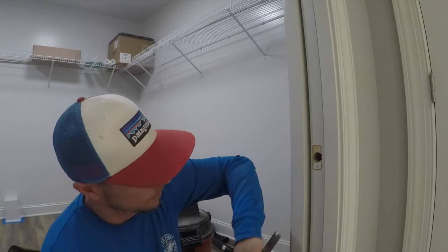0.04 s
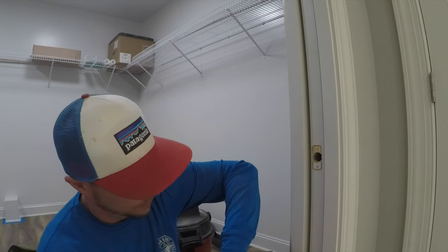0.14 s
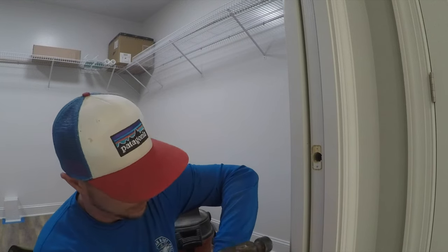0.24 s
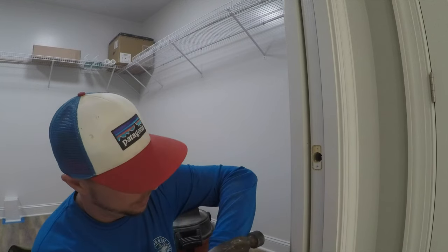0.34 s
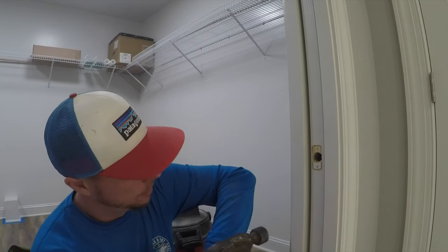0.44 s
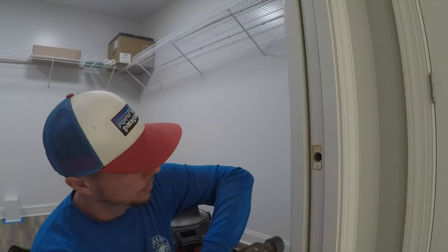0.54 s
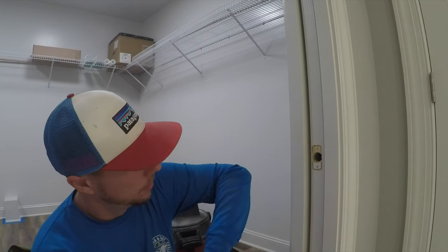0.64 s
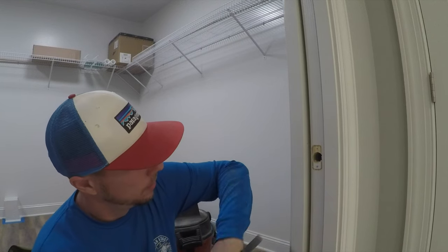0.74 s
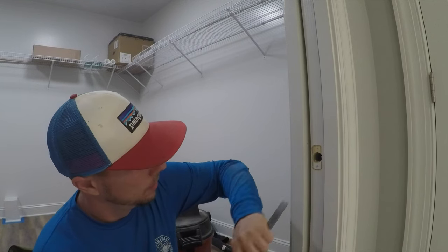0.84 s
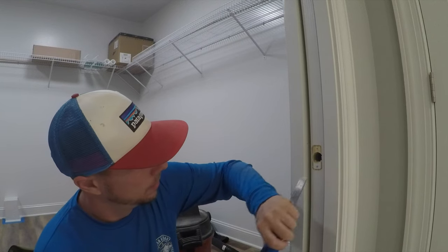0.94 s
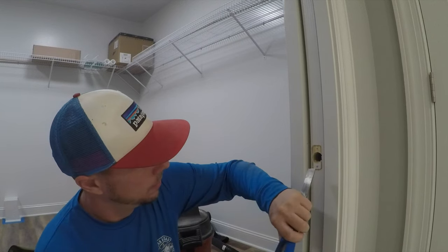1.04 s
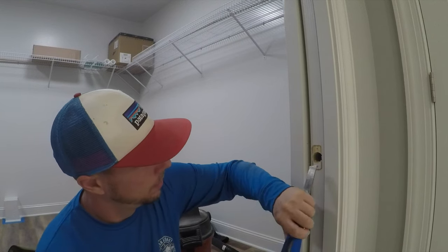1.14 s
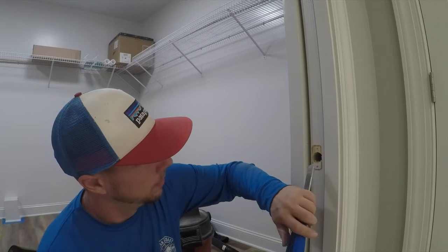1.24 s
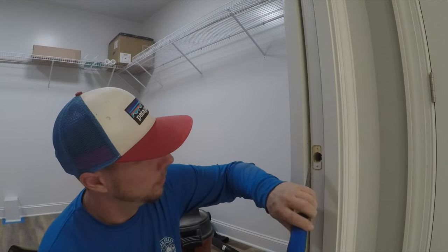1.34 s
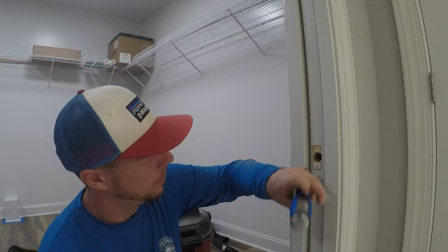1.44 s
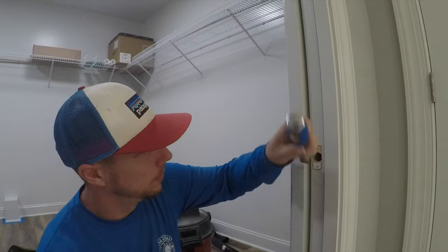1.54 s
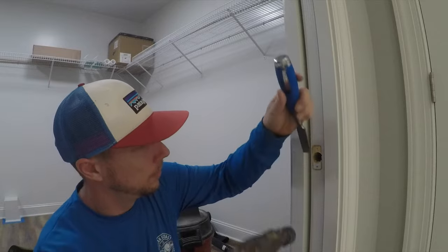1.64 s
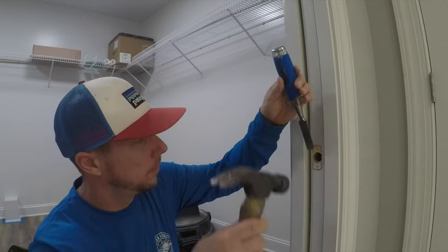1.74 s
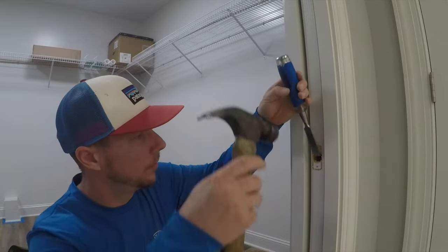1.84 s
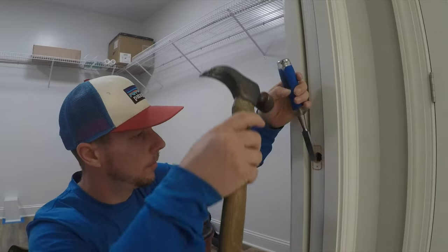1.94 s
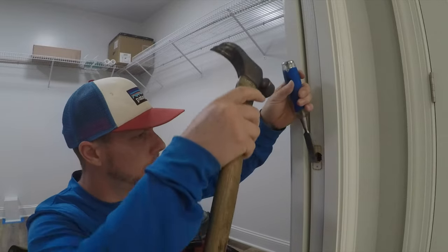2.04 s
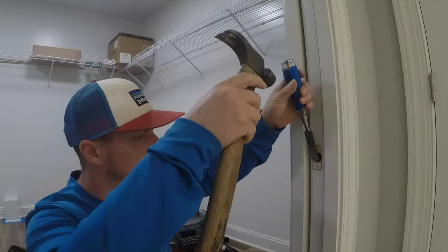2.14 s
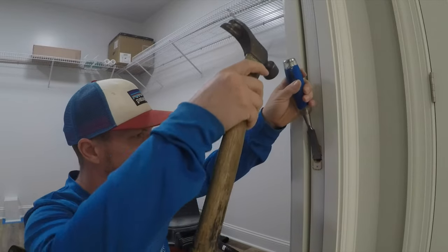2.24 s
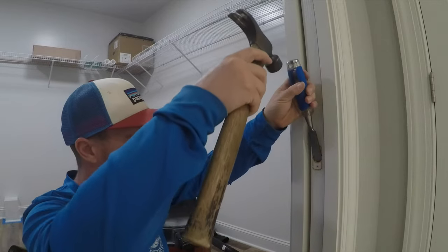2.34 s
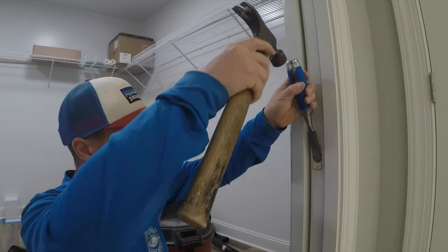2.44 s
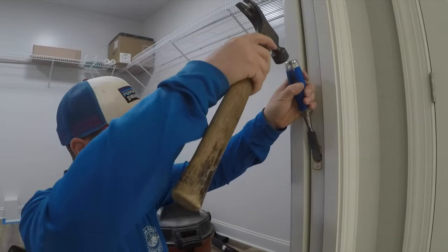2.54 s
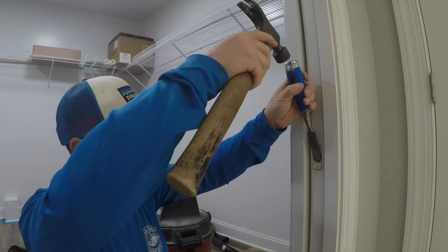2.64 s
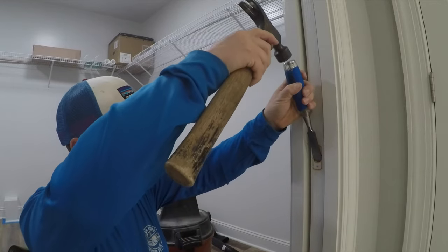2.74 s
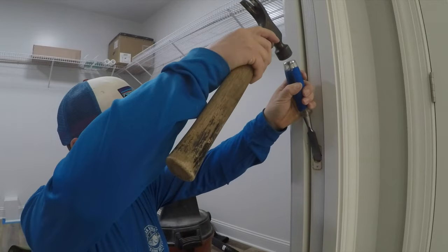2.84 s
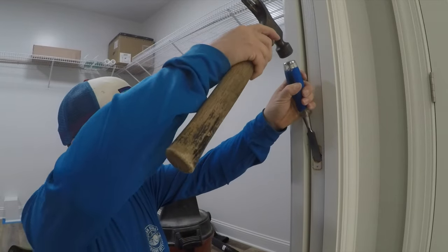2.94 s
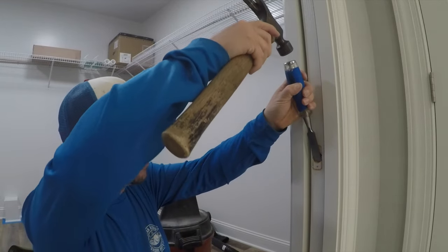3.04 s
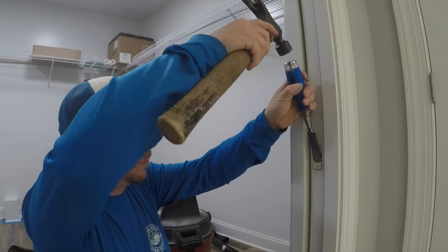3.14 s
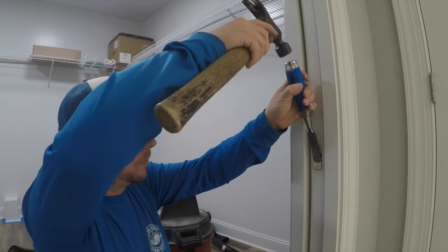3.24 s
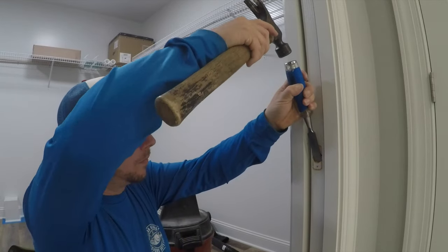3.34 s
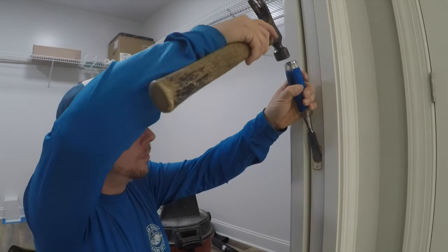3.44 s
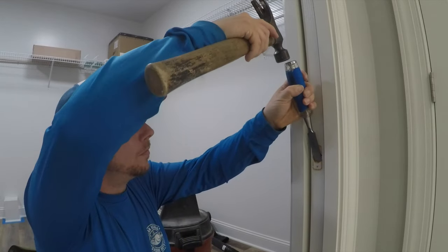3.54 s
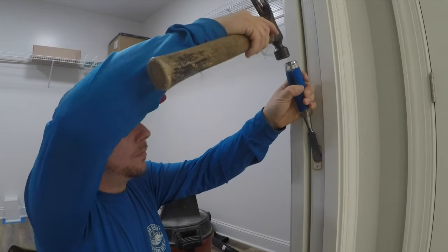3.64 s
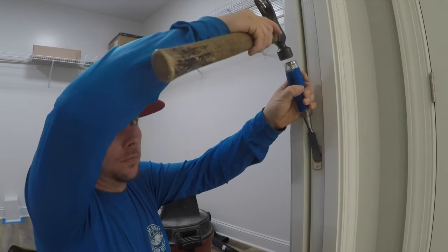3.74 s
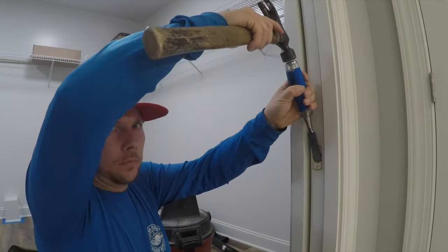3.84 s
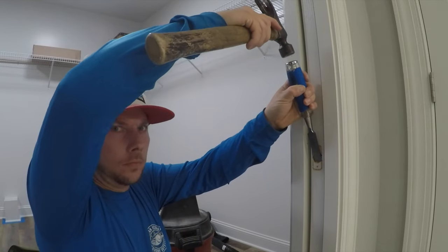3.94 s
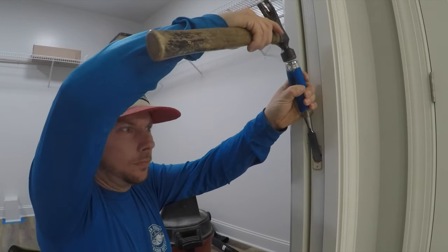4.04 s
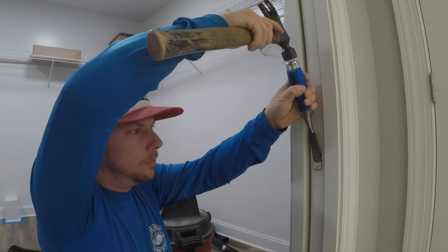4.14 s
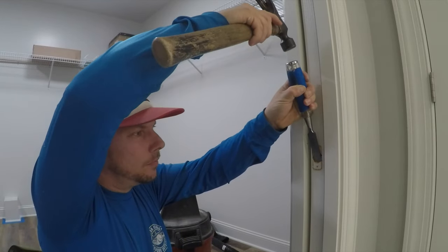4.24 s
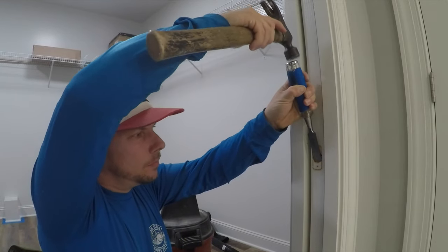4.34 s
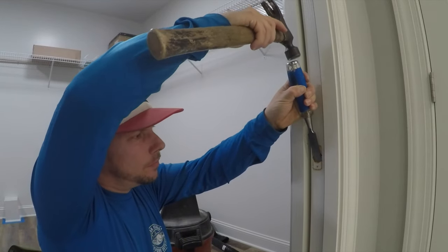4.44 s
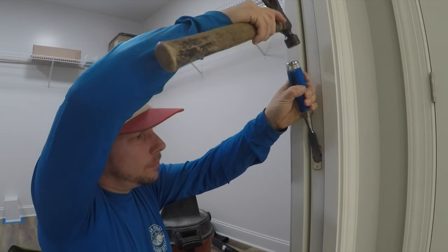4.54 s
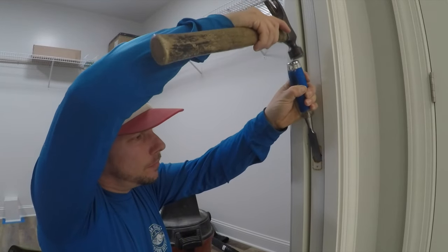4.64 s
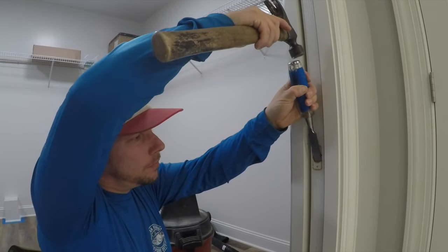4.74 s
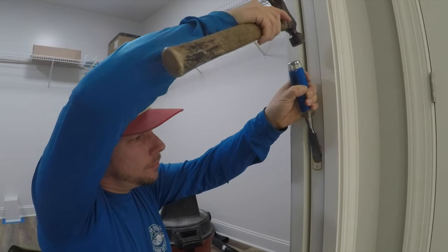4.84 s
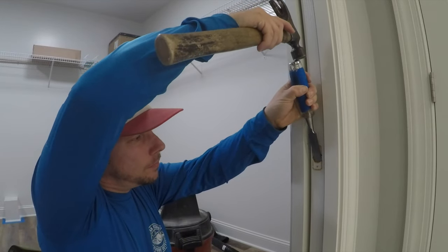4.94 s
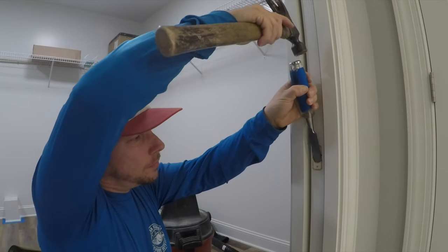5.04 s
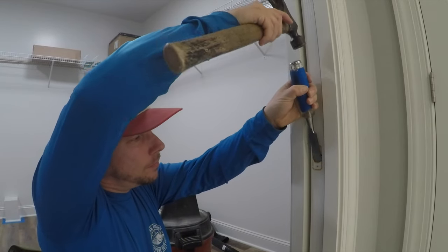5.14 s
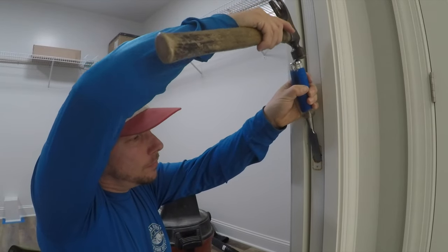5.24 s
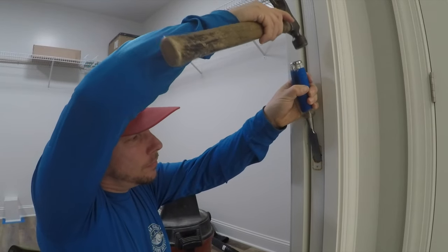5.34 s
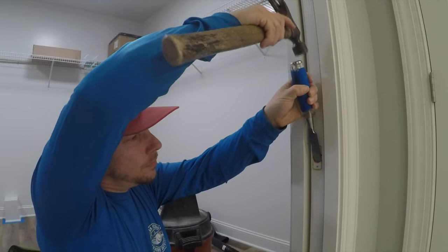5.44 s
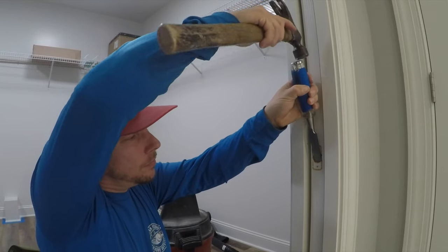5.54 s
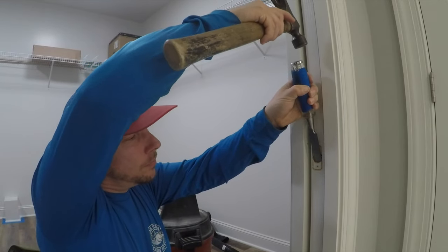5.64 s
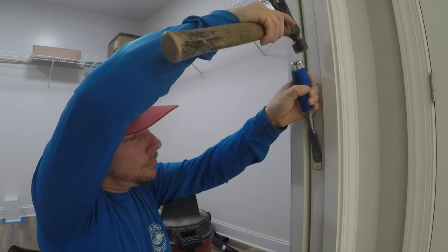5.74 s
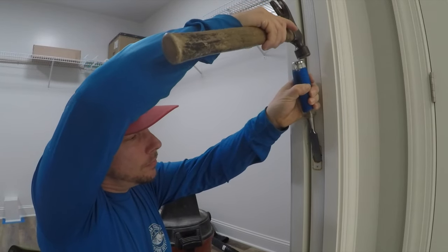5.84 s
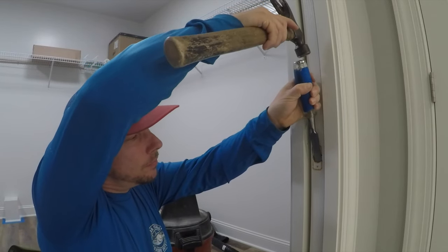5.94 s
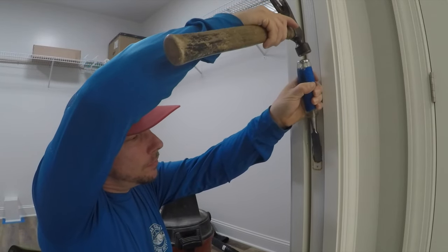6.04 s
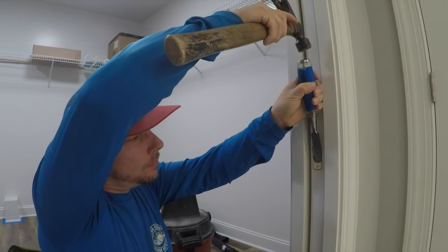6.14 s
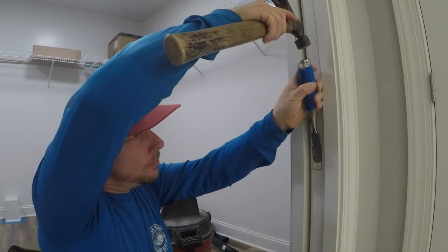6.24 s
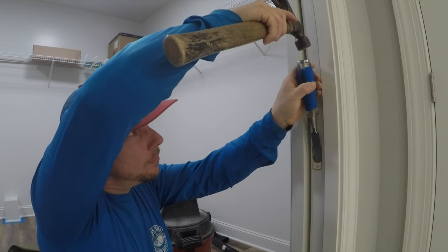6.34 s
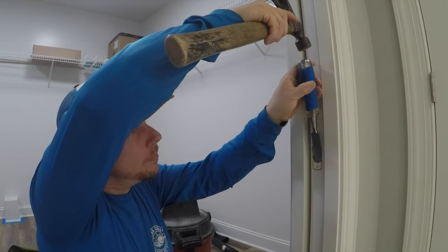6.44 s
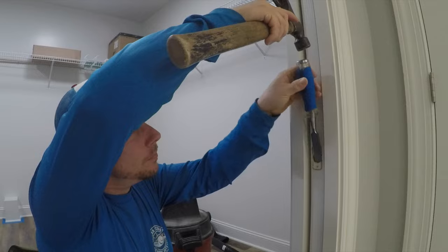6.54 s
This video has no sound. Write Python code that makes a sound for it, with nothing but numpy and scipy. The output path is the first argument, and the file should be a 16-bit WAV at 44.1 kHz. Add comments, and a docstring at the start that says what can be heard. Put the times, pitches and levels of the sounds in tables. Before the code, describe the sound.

A steel hammer taps a chisel into a wooden door edge eight times, sharp ringing blows in a small bare room.

```python
"""A small bare room, one microphone close to a door: a steel hammer taps a chisel into the door's edge.
Eight blows, harder as the blade seats, the last a light one. Each cracks, rings the chisel and the wood,
rattles the hollow panel and sets the whole door swaying; the room rings on for a second.
Before that, tools click in the hand, a sleeve brushes past and the chisel is set down with a knock."""
import sys
import numpy as np
from scipy import signal
from scipy.fft import rfft, irfft, next_fast_len
from scipy.io import wavfile
from scipy.ndimage import map_coordinates

SR = 44100
rng = np.random.default_rng(int(sys.argv[2]) if len(sys.argv) > 2 else 0)


def dump(signal):
    """Clip the signal to [-1, 1] and save it as 16-bit WAV at the path in sys.argv[1]."""
    limited = np.clip(np.atleast_2d(signal).T, -1, 1)
    pcm = np.round(limited * 32767).astype(np.int16)
    wavfile.write(sys.argv[1], SR, pcm)


N = 291060
T = np.arange(int(1.3 * SR)) / SR  # time within one event, s
CLOCK = np.arange(N) / SR  # time within the scene, s

# hammer blows: t/s, force/dB, blade seated/0-1, bite f/Hz, treble at 10 kHz/dB, clear tones/dB
HAMMER_BLOWS = [(3.781, -13, 0.03, 3730, 1, -2), (4.0481, -10, 0.13, 3200, 3, 2.5),
                (4.3479, -3.5, 0.26, 3370, -.5, -1), (4.6448, -3.5, 0.73, 4060, 0.5, 2.5),
                (4.9201, -2, 1, 3970, 0, 0.5), (5.1824, -1.5, 0.95, 4160, 1.5, -10),
                (5.4539, -1, 0.99, 3420, 0, -2.5), (5.819, -9.5, .48, 3600, -18, 1)]
# modes rung by a blow: f/Hz, level with the blade loose/dB, level with it seated/dB, t60/s
CHISEL_DAMPED_MODES = [(2865, -20, -16.5, 0.042), (3154, -20.5, -6, 0.028), (3330, -27.5, -12, 0.033),
                       (3595, -15, -26.5, 0.027), (3923, -11, -18.5, 0.041), (4074, -29.5, -17.5, 0.028),
                       (7870, -18, 0.5, 0.017), (8900, -14.5, -14, 0.0054), (8940, -22.5, -24.5, 0.021),
                       (13200, -22, -29, 0.01), (14600, -33.5, -26, .02)]
CHISEL_CLEAR_TONES = [(5520, -33, -36, .3), (6842, -34, -24, .27), (8062, -18, -30, .2),
                      (9025, -13, -12, .045), (13690, -22, -23, .055), (13950, -32, -24, .05)]
DOOR_EDGE_MODES = [(844.3, -37, -22.5, 0.12), (982, -40.5, -34.5, 0.12), (1316, -15.5, -24.5, 0.018),
                   (1543, -30.5, -21.5, 0.066), (1760, -19.5, -21.5, 0.065), (1985, -16, -26.5, 0.045),
                   (2154, -21.5, -21.5, 0.059)]
# peaks in the door's clack: f/Hz, half width/Hz, level loose/dB, level seated/dB
DOOR_RESONANCES = [(400, 45, 4, 5), (820, 25, 0, 5), (950, 20, 0, 9), (1075, 25, 3, 7), (1290, 70, 4, 4),
                   (1550, 35, 2, 4), (1900, 110, 2, 1), (3170, 70, 5, 4), (3420, 120, 1, 3),
                   (3850, 110, 4, 2), (4220, 120, 3, 4), (8060, 130, 7, 2), (9060, 150, 6, 3),
                   (11200, 120, 6, 1), (13780, 260, 10, 10)]
# spectra of a blow: f/Hz, level/dB
CRACK_SPECTRUM = [(100, -29.5), (400, -23), (800, -14), (1600, 0.5), (2500, -8), (3500, 1.5), (5000, -5.5),
                  (6500, -9), (8000, 4.5), (9200, 1.5), (10000, -17.5), (12800, -15.5), (14500, -13),
                  (16000, -23)]  # steel on steel
LOOSE_CLACK_SPECTRUM = [(130, -10.5), (400, -7), (800, -4.5), (1300, -1), (1900, -2), (2500, -2.5),
                        (3300, -5), (4600, 2.5), (5700, -6), (6900, -0.5), (8800, -5), (9700, -14.5),
                        (13000, -25), (15500, -25)]  # what the door throws into the room, blade loose
SEATED_CLACK_SPECTRUM = [(150, -11.5), (450, -14), (750, -7), (900, -3.5), (1700, -1), (2400, -7),
                         (3300, -2), (4200, -4), (5000, -5), (6200, -8), (8000, -4), (10200, -8),
                         (12900, -18.5), (15000, -23.5)]  # the same, blade seated
PANEL_SPECTRUM = [(40, -11), (80, -9.5), (110, -8), (140, -3.5), (250, -4), (330, -11.5), (600, -11.5),
                  (1000, -17.5), (3000, -60)]  # the hollow panel's rumble
# modes of the door: f/Hz, level/dB, t60/s
SWAY_MODES = [(38.5, -33, .58), (31, -45, .45)]  # the whole door swaying
PLACING_MODES = [(280, -12, .15), (560, -9, .08), (705, -4, .09), (861, 2, .08), (1280, 0, .04),
                 (1500, -4, .03), (1980, -5, .025), (2380, -12, .025), (2900, -8, .02), (3300, -9, .02)]  # knocked as the blade is set on it
# touches on the door: t/s, level/dB
PLACING_KNOCKS = [(1.865, -33.5)]
HAND_NUDGES = [(1.498, -61.5), (2.251, -56.5), (2.471, -61.5)]
# spectra of the knock: f/Hz, level/dB
KNOCK_TICK_SPECTRUM = [(300, -32), (800, -18), (1400, 8.5), (2200, 3), (3300, -10), (4500, -17),
                       (12000, -31)]  # contact noise
KNOCK_BODY_SPECTRUM = [(120, -2), (300, -0.5), (550, -8), (720, 9), (880, 0), (1050, -15), (1600, -6.5),
                       (2300, -21), (3400, -20), (5000, -42), (12000, -48)]  # what it throws into the room
# tools clicking in the hand: t/s, level/dB, f/Hz, t60/s
TOOL_CLICKS = [(0.0825, -44.5, 11100, 0.0038), (0.1478, -42.5, 2780, 0.0083)]
# tools shuffled in the hand: start t/s, hold/s, level/dB
TOOL_SHUFFLES = [(-.06, 0.061, -58), (1.17, .45, -75)]
# spectra of rubbing tools and cloth: f/Hz, level/dB
SHUFFLE_SPECTRUM = [(120, -46), (200, -28), (280, -12.5), (341, -15.5), (513, -5), (844, -4), (2730, -10.5),
                    (14000, -29.5)]
SLEEVE_SPECTRUM = [(1000, -2), (3000, 1.5), (6000, 0.5), (8500, -4), (11000, -15), (16000, -33)]
# the room's decay time: f/Hz, t60/s
ROOM_DECAY = [(100, 0.52), (380, 1.2), (700, 1.045), (1700, 1.3), (4000, 1.02), (8000, 0.81), (11000, 0.53),
              (14000, 0.52)]
# spectra of the walls' answer and of the room tone: f/Hz, level/dB
WALL_SPECTRUM = [(100, 0), (500, 11), (1100, -6), (2000, 1), (4000, -3.5), (6000, 4.5), (8500, 2.5),
                 (14000, -12)]
ROOM_TONE_SPECTRUM = [(12, -27.5), (20, 7), (42, -8), (324, -16.5), (372, -18.5), (427, -16.5),
                      (465, -18.5), (1450, -22.5), (1630, -23), (2150, -24), (15500, -30.5)]

WOOD_DB, CLACK_DB, PANEL_DB, SWAY_DB = 1.5, -25, -33, 8  # the door's parts, relative to the force
HALF_PUSH_SEATED = 0.029  # seated this far, the blade passes half of its push to the door
SLEEVE_DB, ROOM_TONE_DB = -65.5, -65
TOP_HZ = 15400


def hammering():
    """Close up, each blow strikes and clacks; the panel's rumble and the door's sway follow."""
    track = np.zeros(N)
    for s, db, seated, bite_hz, treble_db, tones_db in HAMMER_BLOWS:
        blow = strike(seated, tones_db) + amp(CLACK_DB) * door_clack(seated)
        add(track, s, amp(db) * bite(blow, bite_hz, bite_db=6, treble_db=treble_db))
        push = amp(db) * seated / (seated + HALF_PUSH_SEATED)  # a loose blade hardly moves the door
        add(track, s + 0.008, push * amp(PANEL_DB) * panel(rise=0.0088, t60=0.49))
        add(track, s + 0.01, push * amp(SWAY_DB) * ring(SWAY_MODES, scatter_db=0.5) * swell(rise=0.035))
    return track


def strike(seated, tones_db):
    """Steel meets steel with a crack, and the chisel and the wood under it ring."""
    contact = np.exp(-((T - 0.0016) / 0.0018) ** 2)  # hammer and chisel touch for a moment
    crack_envelope = amp(-8.5) * (contact + fade(t60=0.036)) + amp(-20.5) * fade(t60=0.065)
    crack = noise(CRACK_SPECTRUM, len(T)) * crack_envelope
    steel = ring(seated_modes(CHISEL_DAMPED_MODES, seated), scatter_db=1.5)
    steel += amp(tones_db) * ring(seated_modes(CHISEL_CLEAR_TONES, seated), scatter_db=1.5)
    wood = amp(WOOD_DB) * ring(seated_modes(DOOR_EDGE_MODES, seated), scatter_db=3)
    onset = swell(rise=0.0016)
    return crack * onset + in_room((steel + wood) * onset, wet_db=-46.5)


def seated_modes(modes, seated):
    """The grip of the wood on the blade shifts the strength of each mode."""
    return [(hz, loose + (tight - loose) * seated, t60) for hz, loose, tight, t60 in modes]


def bite(x, bite_hz, bite_db, treble_db):
    """The blade sings at a new pitch in each cut, and a softer contact dulls the treble."""
    def gain(hz):
        peak = np.exp(-((hz - bite_hz) / 240) ** 2)
        return amp(bite_db * peak + treble_db * hz / 10000)
    return filtered(x, gain)


def door_clack(seated, ripple_db=2.7, spacing_hz=40):
    """The door sounds into the room through strong resonances and weak ones that shift with each blow."""
    clack = np.sqrt(1 - seated) * reverb(LOOSE_CLACK_SPECTRUM)
    clack += np.sqrt(seated) * reverb(SEATED_CLACK_SPECTRUM)
    ripple = rng.standard_normal(4096)
    def gain(hz):
        strong_db = sum((loose + (tight - loose) * seated) * np.exp(-((hz - centre) / width) ** 2)
                        for centre, width, loose, tight in DOOR_RESONANCES)
        position = 2 * np.sqrt(hz * 1000) / spacing_hz  # steps of spacing_hz at 1 kHz, wider above
        weak_db = ripple_db * map_coordinates(ripple, [position], mode="mirror")
        return amp(strong_db + weak_db)
    return filtered(clack, gain)


def panel(rise, t60):
    """Bending waves spread slowly through the hollow door and rumble."""
    return noise(PANEL_SPECTRUM, len(T)) * swell(rise) * fade(t60)


def placing():
    """The blade is set on the door with a dull knock, and the hand leans in."""
    track = np.zeros(N)
    for s, db in PLACING_KNOCKS:
        wood = ring(PLACING_MODES, scatter_db=-1)
        tick = amp(-4) * noise(KNOCK_TICK_SPECTRUM, len(T)) * fade(t60=0.049)
        knock = (wood + tick) * swell(rise=0.0008)
        add(track, s, amp(db) * in_room(knock, wet_db=-46.5))
        add(track, s, amp(db - 9) * reverb(KNOCK_BODY_SPECTRUM))
        add(track, s + 0.00614, amp(db - 6) * panel(rise=0.011, t60=0.39))
    for s, db in HAND_NUDGES:
        add(track, s, amp(db) * panel(rise=0.019, t60=0.46))
    return track


def tool_handling():
    """Tools rub and click together in the hand, faint at the microphone."""
    shuffling = sum(amp(db) * stroke(s, attack=0.047, hold=hold, t60=1.5)
                    for s, hold, db in TOOL_SHUFFLES)
    track = shuffling * noise(SHUFFLE_SPECTRUM, N)
    for s, db, hz, t60 in TOOL_CLICKS:
        click = noise([(hz / 2, -22), (hz, 0), (hz * 2, -30)], len(T)) * fade(t60)
        add(track, s, in_room(amp(db) * click, wet_db=-43))
    return track


def sleeve():
    """Cloth brushes past once as the arm lifts."""
    brush = stroke(start=1.773, attack=0.2, hold=0.24, t60=1.3)
    return amp(SLEEVE_DB) * brush * noise(SLEEVE_SPECTRUM, N)


def in_room(sound, wet_db):
    """The direct sound at the microphone, and the bare walls' answer to it."""
    return sound + amp(wet_db) * signal.fftconvolve(sound, reverb(WALL_SPECTRUM))[:len(T)]


def reverb(spectrum):
    """A diffuse room tail; the middle range outlasts the bass and the treble."""
    hz, t, bands = signal.stft(noise(spectrum, len(T)), SR, nperseg=256)
    bands = bands * fade(along(ROOM_DECAY, hz)[:, None], t)
    tail = signal.istft(bands, SR, nperseg=256)[1][:len(T)]
    return tail * swell(rise=0.0048)


def room_tone():
    """The room's steady low rumble and faint hiss."""
    return amp(ROOM_TONE_DB) * noise(ROOM_TONE_SPECTRUM, N)


def ring(modes, scatter_db):
    """Damped modes, struck a little differently each time."""
    return sum(amp(db + scatter_db * rng.normal()) * fade(t60)
               * np.sin(2 * np.pi * (hz * T + rng.random())) for hz, db, t60 in modes)


def noise(spectrum, size):
    """Coloured noise of rms 1."""
    x = filtered(rng.standard_normal(size), lambda hz: amp(along(spectrum, hz)))
    return x / np.sqrt(np.mean(x ** 2) + 1e-20)


def stroke(start, attack, hold, t60):
    """The envelope of one rubbing movement: it rises, holds and dies away; times in seconds."""
    t = CLOCK - start
    return np.clip(t / attack, 0, 1) * fade(t60, np.maximum(t - attack - hold, 0))


def swell(rise):
    """A smooth onset that takes about rise seconds."""
    return 1 - np.exp(-(T / rise) ** 2)


def fade(t60, t=T):
    """A decay of 60 dB in t60 seconds."""
    return np.exp(-np.log(1000) * t / t60)


def filtered(x, gain):
    """x times a gain that depends on frequency."""
    size = next_fast_len(len(x) + 8192)
    hz = np.fft.rfftfreq(size, 1 / SR)
    return irfft(rfft(x, size) * gain(hz), size)[:len(x)]


def along(points, hz):
    """A curve of f/Hz, value points, read on a log frequency axis."""
    frequencies, values = np.transpose(points)
    return np.interp(np.log(hz + 1), np.log(frequencies + 1), values)


def amp(db):
    """Decibels to gain."""
    return 10 ** (np.asarray(db) / 20)


def add(track, s, sound):
    """Mix a sound into the track at s seconds."""
    part = track[max(round(s * SR), 0):][:len(sound)]
    part += sound[:len(part)]


def scene():
    """The work at the door over a quiet room tone, in mono."""
    return (hammering() + placing() + tool_handling() + sleeve() + room_tone())[None]


def record(dry):
    """The hardest blows overload the microphone; the treble falls off steeply above TOP_HZ."""
    clipped = dry[0] / (1 + np.abs(dry[0]) ** 6) ** (1 / 6)
    return filtered(clipped, lambda hz: 1 / np.sqrt(1 + (hz / TOP_HZ) ** 120))[None]


dry = scene()
out = record(dry)
dump(out)
```